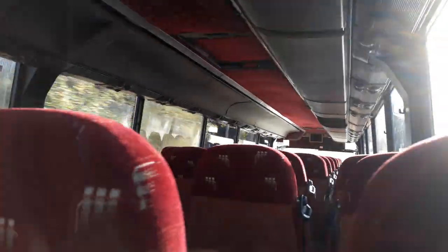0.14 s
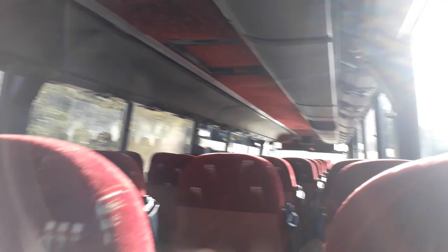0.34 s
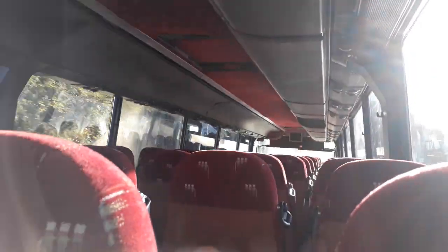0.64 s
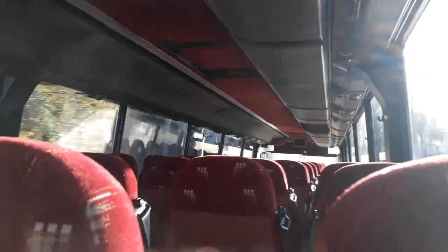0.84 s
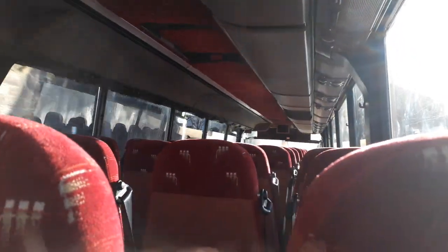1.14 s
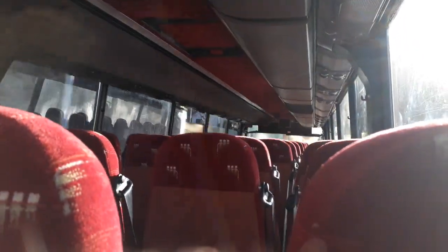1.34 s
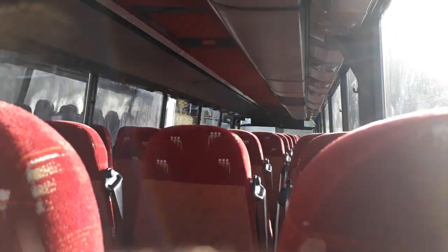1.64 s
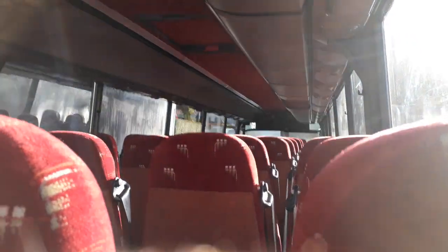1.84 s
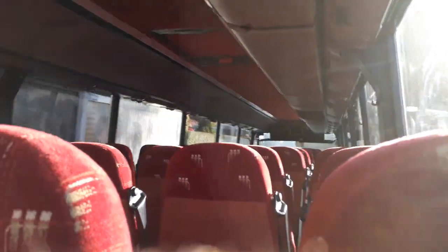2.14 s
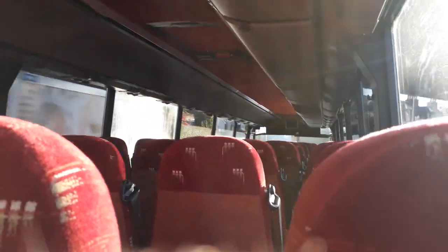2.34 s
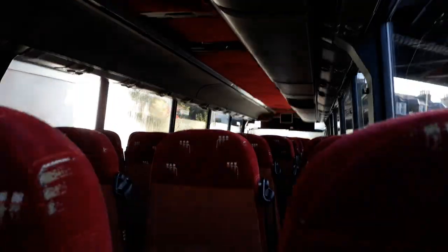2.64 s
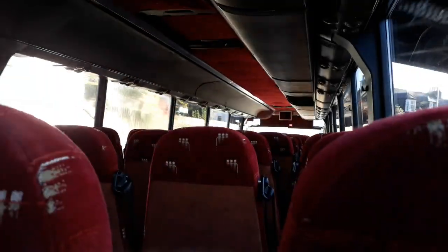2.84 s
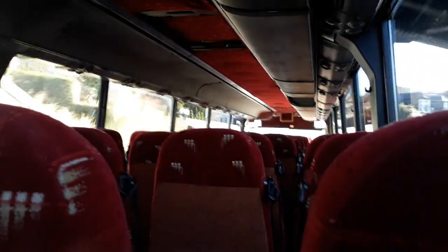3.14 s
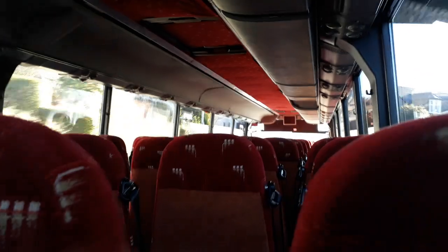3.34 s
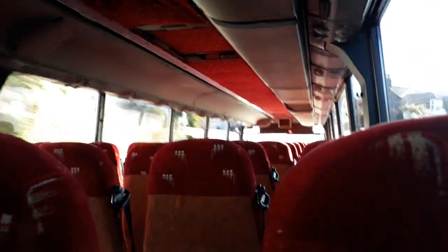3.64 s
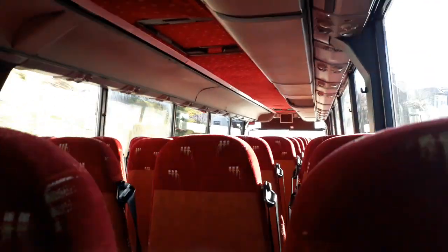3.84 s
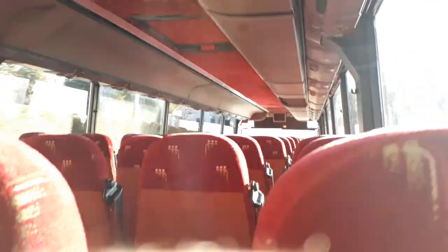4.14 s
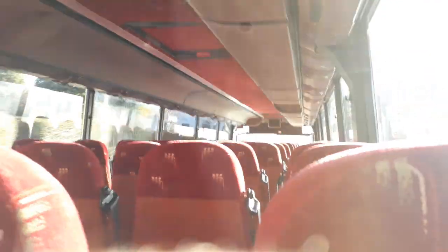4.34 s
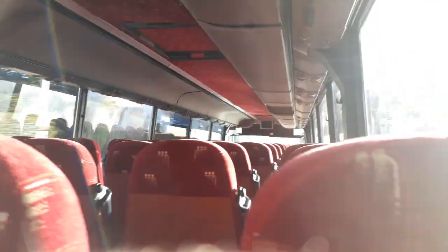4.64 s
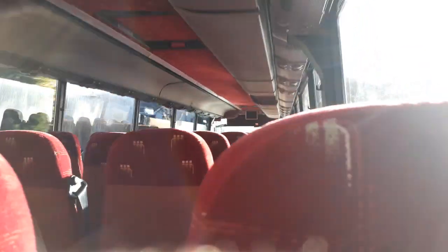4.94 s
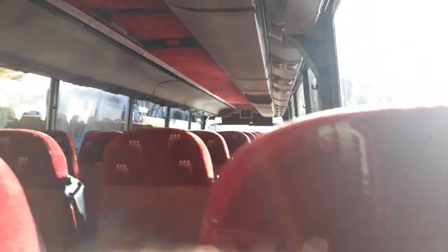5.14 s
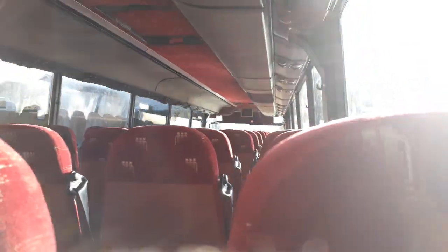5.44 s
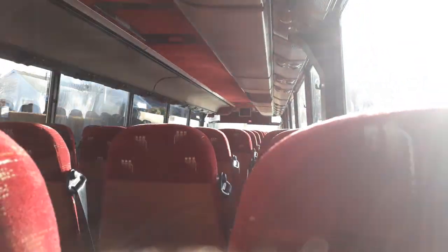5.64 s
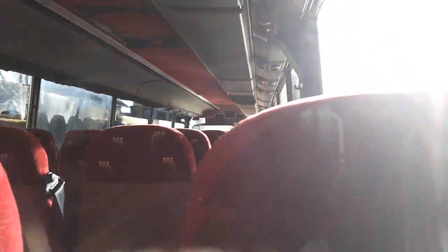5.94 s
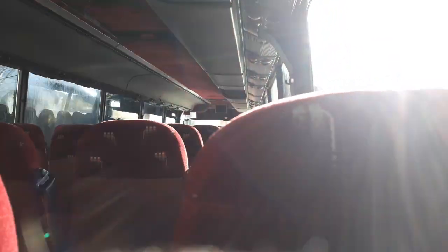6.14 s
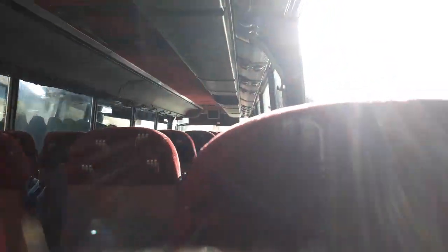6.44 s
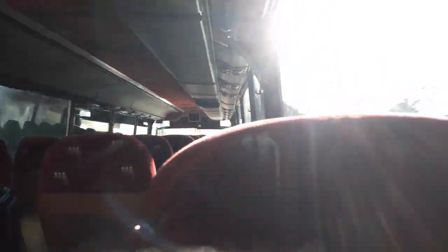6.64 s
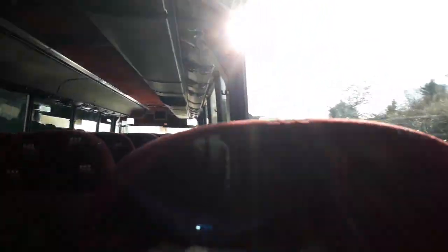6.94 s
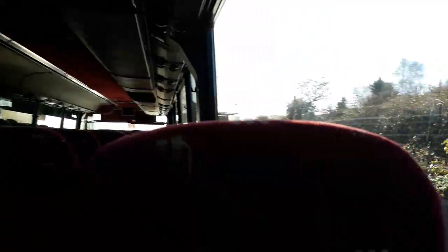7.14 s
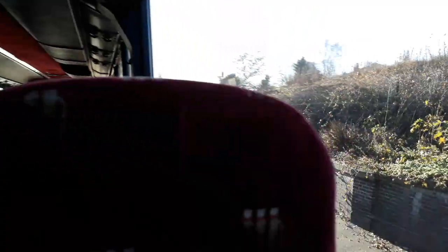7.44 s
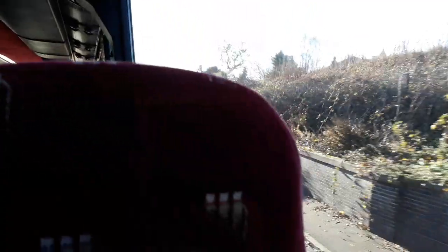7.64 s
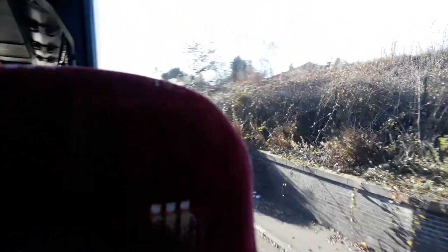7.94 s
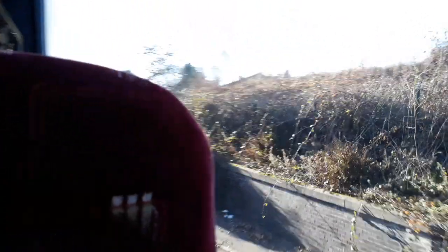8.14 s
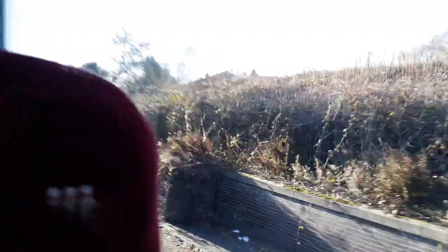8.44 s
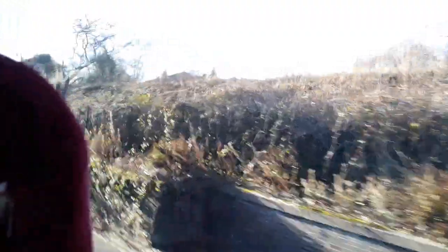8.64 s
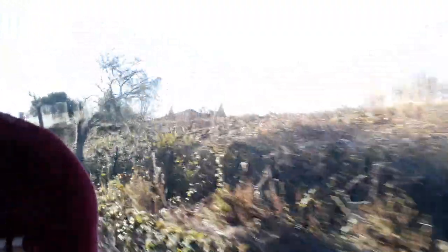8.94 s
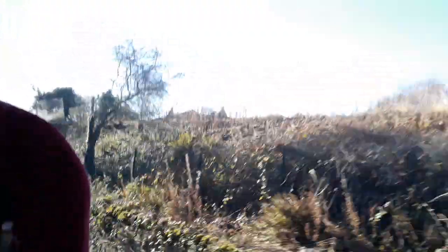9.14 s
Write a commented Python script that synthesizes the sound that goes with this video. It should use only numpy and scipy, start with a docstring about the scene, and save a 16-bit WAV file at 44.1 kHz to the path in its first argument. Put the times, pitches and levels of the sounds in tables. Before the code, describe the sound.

Heard from a passenger seat, the deep boom of a coach's rear diesel fills the cabin along with road noise. The revs fall slowly while panels and loose fittings rattle and tick. A quick rev marks a downshift, and the engine climbs under load, raspier now, with a thin turbo whine and a faint hiss of air. Light rattles, clicks and small metal pings continue as the coach gathers speed.

```python
"""Inside a diesel coach

A rear six-cylinder diesel coasts down, blips for a lower gear, then pulls. Engine and gearbox orders
force the saloon's resonances over road roar; combustion rasps and the turbo whistles up under load.
Impacts excite damped modes: a loose fitting ticks, a small metal part pings, a seat is tapped.
Trim panels rattle and clips snap in noise bursts; an air valve vents and a window seal squeaks."""
import sys
import numpy as np
from scipy import signal
from scipy.fft import rfft, irfft, next_fast_len
from scipy.io import wavfile
from scipy.ndimage import uniform_filter1d, map_coordinates

SR = 44100
rng = np.random.default_rng(int(sys.argv[2]) if len(sys.argv) > 2 else 0)


def dump_mix(stems):
    """Bounce the given channels to the path in sys.argv[1] as a 16-bit WAV at rate SR."""
    frames = np.atleast_2d(stems).T  # one column per channel
    limited = np.clip(frames, -1, 1)  # hard clip at full scale
    pcm = np.round(limited * 32767).astype(np.int16)
    wavfile.write(sys.argv[1], SR, pcm)


N = 410130

# Engine load: t/s, share of full fuel (0-1)
FUEL = [(0, 0.4), (4.66, 0.1), (4.74, 0.64), (5.2, 0.63), (5.35, 0.21), (5.55, 0.7), (6.1, 0.7),
        (6.3, 0.86), (7.3, 0.79), (7.6, 0.8), (9.3, 0.96)]


def amp(db):
    """Amplitude ratio of a level: a factor of ten per 20 dB."""
    return 10 ** (np.asarray(db) / 20)


def unit(x):
    """Normalisation to unit RMS."""
    return x / np.sqrt(np.mean(x ** 2) + 1e-20)


def along(points, hz):
    """Interpolation of (f/Hz, value) points on a logarithmic frequency axis."""
    f, v = np.transpose(points)
    return np.interp(np.log(hz + 1), np.log(f + 1), v)


def curves(rows, step=1):
    """Linear interpolation in time of each column after t/s, every step samples."""
    times, *columns = np.transpose(rows)
    return [np.interp(np.arange(0, N, step) / SR, times, column) for column in columns]


def wobble(rate, step=1):
    """Slow random modulation: a spline with rate knots a second."""
    position = np.arange(0, N, step) * rate / SR
    return map_coordinates(rng.standard_normal(200), [position], order=2, mode="wrap")


def filtered(x, response):
    """Linear filtering: the spectrum times a complex frequency response."""
    size = next_fast_len(x.shape[-1] + 8192)
    return irfft(rfft(x, size) * response(np.fft.rfftfreq(size, 1 / SR)), size)[..., :x.shape[-1]]


def coloured(x, spectrum):
    """Spectral shaping by (f/Hz, gain/dB) points."""
    return filtered(x, lambda hz: amp(along(spectrum, hz)))


def patchy_noise(depth_db):
    """Two white noises, amplitude-modulated in random patches of time and frequency."""
    spectra = signal.stft(rng.standard_normal((2, N)), nperseg=512)[2]
    patches = uniform_filter1d(rng.standard_normal(spectra.shape[1:]), size=6, axis=0)
    patches = uniform_filter1d(patches, size=12, axis=1)
    return unit(signal.istft(spectra * amp(depth_db * unit(patches)), nperseg=512)[1][:, :N])


def stereo_field(pair):
    """Partial coherence: two signals mix to be alike in the bass and less so in the treble."""
    coherence = [(60, .9995), (130, .99), (290, .82), (640, .4), (1400, .45), (15000, .2)]  # likeness of the channels: f/Hz, coherence
    balance = [(60, -.7), (130, -1.6), (220, -2), (450, -.7), (1200, 1.5), (2400, -.3), (4400, -1),
               (8000, -5), (15000, -6)]  # left over right: f/Hz, level/dB
    lead = [(700, -1), (1500, 15), (16000, 16.5)]  # earlier arrival on the left: f/Hz, lead/samples
    half = np.array([[.5], [-.5]])

    def mix(hz):
        angle = np.arccos(np.clip(along(coherence, hz), -1, 1)) / 2
        return np.array([np.cos(angle), np.sin(angle)])

    def skew(hz):
        return amp(half * along(balance, hz)) * np.exp(2j * np.pi * half * hz * along(lead, hz) / SR)

    mid, side = filtered(pair, mix)
    return filtered(np.array([mid + side, mid - side]), skew)


def place(track, start, sound, pan_db):
    """Time and level cues: the sound reaches the left 14 samples early; pan_db is left over right."""
    at, length = round(start * SR), sound.shape[1]
    track[0, at:at + length] += sound[0] * amp(pan_db / 2)
    track[1, at + 14:at + 14 + length] += sound[1] * amp(-pan_db / 2)


def draught_and_valve(load):
    """Turbulent flow: a thin draught hisses with load; an air valve opens, blows, then leaks on."""
    spectrum = [(7000, -30), (8500, -1), (11000, 0), (16000, 0)]  # draught hiss: f/Hz, relative level/dB
    draught = unit(coloured(rng.standard_normal((2, N)), spectrum))
    vent = unit(filtered(draught, lambda hz: 1 / (1 + (hz / 13000) ** 40)))
    opens, shuts, edge_s = 6.05, 7.226, 0.12
    vent_db, = curves([(opens, -100), (opens + edge_s, -74.5), (shuts, -74.5), (shuts + edge_s, -87)])
    return draught * amp(-78 + 6 * load) + vent * amp(vent_db)


def whistle(glide, spread_hz, steady=0):
    """Noise modulation spreads a gliding tone into a narrow band; steady weights the pure carrier."""
    span = slice(round(glide[0][0] * SR), round(glide[-1][0] * SR))
    hz, db = (curve[span] for curve in curves(glide))
    slow_noise = filtered(rng.standard_normal((2, len(hz))), lambda f: np.exp(-(f / spread_hz) ** 2))
    smear = unit(steady + unit(slow_noise))
    flutter_db = 1.3 * wobble(7)[span]
    carrier = np.sqrt(2) * np.sin(2 * np.pi * np.cumsum(hz) / SR)
    track = np.zeros((2, N))
    track[:, span] = amp(db + flutter_db) * smear * carrier
    return track


def window_seal():
    """Friction tones: the seal gives a two-tone creak and a nearly pure squeak."""
    squeak = [(9, 13300, -86), (9.04, 14900, -69), (9.065, 14500, -61), (9.09, 14700, -71),
              (9.125, 13900, -74), (9.165, 13600, -74), (9.19, 13000, -80)]  # squeak glide: t/s, f/Hz, level/dB
    creak = [(3.59, 14000, -92), (3.64, 14480, -80), (3.7, 14910, -74), (3.73, 14900, -76),
             (3.75, 14500, -84)]  # upper tone of the creak: t/s, f/Hz, level/dB
    lower = [(s, .9 * hz, db - 7) for s, hz, db in creak]
    squeal = whistle(squeak, spread_hz=27, steady=2.5)
    return squeal + whistle(creak, spread_hz=90) + whistle(lower, spread_hz=90)


def clip_snaps():
    """Two-stage decay: each plastic clip gives a bright crack and a short scattered tail."""
    snaps = [(0.02, -34.5), (0.0782, -45.5), (0.26, -50.5), (0.2906, -40.5), (0.4908, -53.5), (0.7028, -51),
             (0.7418, -46.5), (0.7997, -52), (0.8475, -54), (1.0006, -57.5), (1.0779, -52), (1.379, -47),
             (1.6531, -51), (1.8033, -56), (3.0177, -59.5), (3.1822, -54.5), (3.758, -51), (3.841, -42),
             (3.864, -45.5), (4.011, -50), (4.578, -48.5), (4.715, -55.5), (5.0459, -51.5), (5.1497, -50.5),
             (6.4477, -50.5), (7.989, -38), (8.8064, -51), (8.844, -49)]  # clips snapping: t/s, level before shaping/dB
    spectrum = [(1500, -39.5), (3000, -6.5), (5000, 4.5), (7200, 10.5), (8800, -9), (11000, 3.5),
                (15500, -2)]  # colour of a clip: f/Hz, gain/dB
    crack_t60, tail_t60 = 0.0098, 0.065
    track, t = np.zeros((2, N + SR)), np.arange(SR // 10) / SR
    envelope = (amp(-60 * t / crack_t60) + amp(-12.5 - 60 * t / tail_t60)) * (1 - np.exp(-t / .0004))
    for start, db in snaps:
        place(track, start, amp(db) * envelope * rng.standard_normal((2, len(t))), pan_db=-9)
    return coloured(track, spectrum)[:, :N]


def struck(blows, modes, pan_db, clack=.5):
    """Free vibration: damped modes ring after a contact clack; windows and roof reflect a tail."""
    track = np.zeros((2, N + SR))
    t, late = np.arange(SR // 20) / SR, np.arange(SR // 5) / SR
    for start, db, upper_db, main_hz in blows:
        ring = np.zeros(len(t))
        for ratio, mode_db, t60 in modes:
            envelope = amp(mode_db + (ratio > 1.75) * upper_db + rng.normal(0, 1) - 60 * t / t60)
            ring += envelope * np.sin(2 * np.pi * ratio * main_hz * rng.normal(1, .02) * t)
        ring += clack * amp(-60 * t / 0.005) * uniform_filter1d(rng.standard_normal(len(t)), size=8)
        ring *= 1 - np.exp(-t / 0.00044)
        room = rng.standard_normal((2, len(late))) * amp(-24.5 - 60 * late / 0.09)
        room *= 1 - np.exp(-late / 0.0013)
        room[:, 0] = 1  # direct sound
        room[:, round(rng.uniform(.005, .0125) * SR)] = rng.uniform(.15, .45)  # one bounce
        place(track, start, amp(db) * signal.fftconvolve(ring[None], room, axes=1), pan_db)
    return track[:, :N]


def loose_fitting():
    """Heavy damping: the fitting's inharmonic modes die so fast that each blow is a tick."""
    blows = [(0.2924, -21, -14.5, 2445), (0.304, -27.5, -12, 1800), (0.3155, -34.5, -25, 2280),
             (0.3611, -37, -26, 2470), (0.403, -30.5, -22, 2370), (0.4273, -30.5, -22, 2350),
             (0.4484, -40.5, -22, 2290), (0.4635, -36.5, -20, 2350), (0.733, -33.5, -30, 2350),
             (0.722, -27.5, -26, 2369), (1.2465, -35, -29, 2290), (1.3538, -21.5, -16, 2350),
             (1.5984, -25.5, -13, 2350), (1.8037, -25.5, -14, 2370), (3.3702, -37.5, -27, 2320),
             (3.766, -28, -30, 2280), (3.908, -34, -22, 2300), (4.3163, -34.5, -31, 2300)]  # impacts: t/s, level/dB, upper-mode gain/dB, main mode f/Hz
    modes = [(0.72, -2, 0.008), (1, 6, 0.009), (1.17, -3, 0.006), (1.43, -3, 0.006), (2.07, 13, 0.004),
             (2.949, 4, 0.004)]  # its modes: ratio to the main mode, level/dB, T60/s
    return struck(blows, modes, pan_db=-7)


def seat_taps():
    """Impact excitation: something hard taps a seat back twice."""
    blows = [(8.5973, -29.5, -17, 2412), (8.7128, -27, -8, 2232)]  # taps: t/s, level/dB, upper-mode gain/dB, main mode f/Hz
    modes = [(0.62, 8, 0.011), (0.8, 4.5, 0.011), (1, 8, 0.011), (1.2, 4, 0.01), (1.45, -1, 0.008),
             (1.9, 6.5, 0.006)]  # seat-back modes: ratio to the main mode, level/dB, T60/s
    return struck(blows, modes, pan_db=-5.5)


def metal_pings():
    """Lighter damping: two modes of a small metal part ring long enough to have a pitch."""
    blows = [(5.567, -47, 2, 3356), (5.6233, -42, 0, 3350), (5.6622, -43, 0, 3358),
             (5.7096, -35.5, 0, 3380), (6.8031, -44, 0, 3323), (7.7091, -42, 0, 3355),
             (7.7904, -37, 0, 3342), (8.6285, -37, 3, 3350)]  # impacts: t/s, level/dB, upper-mode gain/dB (no effect), main mode f/Hz
    modes = [(1, -1.5, 0.027), (1.26, -8, .02)]  # its modes: ratio to the main mode, level/dB, T60/s
    return struck(blows, modes, pan_db=0, clack=.1)


def trim_rattles():
    """Intermittent contact: each jolt gives a spiky, fast-dying noise burst and tiny ringing impacts."""
    jolts = [(0.0199, -25.5, 0.14), (0.088, -32, 0.13), (0.193, -31, 0.12), (0.2637, -37.5, 0.069),
             (0.2924, -28, 0.044), (0.7, -29, 0.13), (0.76, -37.5, 0.14), (0.7966, -28, 0.11),
             (0.8444, -34, 0.15), (0.9056, -32.5, 0.12), (1.172, -44.5, 0.16), (1.2437, -41, 0.1),
             (1.3557, -36.5, 0.13), (1.653, -38.5, 0.061), (1.8032, -32.5, 0.027), (2.2057, -35, 0.055),
             (2.6016, -47, 0.056), (2.7014, -50, 0.04), (3.085, -42.5, 0.072), (3.141, -39.5, 0.1),
             (3.8423, -40.5, 0.12), (4.012, -43, 0.086), (4.5765, -39, 0.058), (4.6917, -35.5, 0.13),
             (4.91, -38, 0.036), (4.9646, -37, 0.11), (5.018, -34.5, 0.13), (5.1488, -41, 0.082),
             (5.7103, -39.5, 0.11), (5.7583, -32.5, 0.1), (5.804, -36.5, 0.08), (5.8472, -41, 0.11),
             (6.3134, -46.5, 0.046), (6.4492, -41, 0.06), (6.6937, -37.5, 0.12), (6.8497, -37.5, 0.091),
             (6.9894, -40, 0.063), (7.254, -31, 0.078), (7.3003, -35, 0.15), (7.3454, -37.5, 0.064),
             (7.4306, -40, 0.05), (7.4797, -40, 0.05), (7.5317, -37.5, 0.17), (7.6148, -32.5, 0.1),
             (7.7937, -42.5, 0.099), (7.986, -28.5, 0.11), (8.0412, -34, 0.082), (8.16, -34.5, 0.1),
             (8.4467, -34, 0.083), (8.844, -38, 0.092), (9.0868, -32.5, 0.1)]  # jolts of the panels: t/s, level/dB, T60/s
    spectrum = [(700, -56), (1000, 0), (1800, -1.5), (2500, -3.5), (2750, -0.5), (3050, -6), (3370, -2.5),
                (3800, -4.5), (5000, -6), (5700, -11), (7000, -12), (8000, -21.5), (8800, -51.5),
                (10000, -85)]  # colour of the panels: f/Hz, gain/dB
    modes = [(2350, 1.5, 0.0088), (2550, -1.5, 0.0074), (3400, -5.5, 0.012), (4600, -5, .006)]  # modes rung by the tiny impacts: f/Hz, level/dB, T60/s
    panel, top, impacts = np.zeros((3, 2, N + SR))
    t = np.arange(SR // 5) / SR
    faint_jolts = [(when * N / SR, -54 + 6 * size, 0.057) for when, size in rng.random(size=(20, 2))]
    for start, db, t60 in jolts + faint_jolts:
        chatter = amp(21 * uniform_filter1d(rng.standard_normal(len(t)), size=49))  # jumps about each ms
        noise = 0.37 * rng.standard_normal(len(t)) + 1.02 * rng.standard_normal((2, len(t)))
        rebounds = sum(np.exp(-((t - at) / 0.0026) ** 2) for at in t60 * rng.uniform(0, 0.38, size=2))
        burst = noise * chatter * (1 - np.exp(-t / 0.00033)) * (1 + 0.65 * rebounds)
        fall_db = -60 * (t / t60) ** 1.48
        pan_db = rng.normal(-2, 2)  # the panels lie scattered to the right
        place(panel, start, amp(db + fall_db) * burst, pan_db)
        place(top, start, amp(db + 1.6 * fall_db) * burst, pan_db)  # the top octave dies sooner
        ring_t = t[:SR // 50]
        for when, lightness, choice in rng.random(size=(5, 3)):
            delay = 0.33 * t60 * when
            hz, mode_db, ring_t60 = modes[int(choice * len(modes))]
            hz *= 1 + .06 * (lightness - .5)
            ping = amp(mode_db - 60 * ring_t / ring_t60) * np.sin(2 * np.pi * hz * ring_t)
            gain = amp(db - 2 - 10 * lightness + fall_db[round(delay * SR)])
            place(impacts, start + delay, gain * np.array([ping, ping]), pan_db)
    top = filtered(top, lambda hz: amp(-29.5) / (1 + (8800 / (hz + 1)) ** 12))
    return (coloured(panel, spectrum) + top + impacts)[:, :N]


def turbocharger():
    """Aerodynamic tones: a breathy intake whistle, then the narrower whine of the compressor blades."""
    intake = [(4.7, 3650, -88), (4.9, 3940, -67), (5.25, 3997, -62), (5.4, 3944, -79), (5.6, 4050, -61),
              (5.85, 4320, -57), (6.0, 4290, -65), (6.08, 4358, -62), (6.22, 4612, -57.5), (6.5, 4550, -60),
              (6.85, 4686, -58.5), (7.4, 4512, -61), (7.8, 4395, -93)]  # intake whistle: t/s, f/Hz, level/dB
    blades = [(7.3, 6408, -97), (7.7, 6737, -67.5), (8.4, 7420, -68.5), (9.3, 7913, -69.5)]  # blade whine: t/s, f/Hz, level/dB
    return whistle(intake, spread_hz=210) + whistle(blades, spread_hz=75, steady=.2)


def cam_turns(step=1):
    """Phase as the integral of speed: the camshaft turns once per two crankshaft turns."""
    crank_speed = [(0, 1143), (0.6, 1112), (1.2, 1058), (2.4, 985.7), (3.0, 934.4), (3.3, 895),
                   (3.6, 868.7), (3.9, 808.3), (4.35, 768.6), (4.65, 718.5), (5.1, 926), (5.25, 944),
                   (5.45, 908.5), (5.75, 1021), (6.15, 1120), (6.45, 1215), (7.0, 1305), (7.9, 1370),
                   (8.7, 1434), (9.3, 1482)]  # crankshaft: t/s, speed/rpm
    return np.cumsum(curves(crank_speed, step)[0]) * step / (120 * SR)


def combustion(load):
    """Amplitude modulation: six firings per camshaft turn pulse a hiss and a rasp that grow with load."""
    hiss_spectrum = [(760, -41), (1300, 4.5), (1530, -1), (2610, -11), (3870, -14.5), (4260, -13.5),
                     (5230, -21.5), (5660, -27), (6950, -21.5), (8600, -45.5), (11200, -66), (18900, -120)]  # engine hiss: f/Hz, relative level/dB
    rasp_spectrum = [(800, -9.5), (1000, -8.5), (1100, 3), (1170, -1), (1280, 1), (1420, -14.5),
                     (1800, -13), (2600, -17), (4000, -62.5), (6000, -120)]  # combustion rasp: f/Hz, relative level/dB
    rasp_course = [(5.5, -42, .1), (6.05, -42, .25), (6.25, -38.5, .55), (7.2, -38.5, .55), (7.5, -41, .4),
                   (9.3, -42, .4)]  # rasp at full fuel: t/s, level/dB, weight of the clean blows
    turns = cam_turns()
    gate = 1 + (0.043 + 0.046 * load) * np.cos(2 * np.pi * 6 * turns)
    hiss = unit(coloured(gate * patchy_noise(1.4), hiss_spectrum))
    rasp_db, blow_weight = curves(rasp_course)
    blows = np.diff(np.floor(3 * turns), prepend=0)  # every other firing lands harder
    blows = blow_weight * unit(blows * amp(rng.normal(0, 0.87, N)))
    rasp = unit(coloured(blows + gate * rng.standard_normal((2, N)), rasp_spectrum))
    return hiss * amp(-55 + 12.5 * load) + rasp * load * amp(rasp_db)


def shaft_orders():
    """Forced vibration: sines locked to the shafts swell as they sweep through body-frame resonances."""
    # Engine orders: multiple of camshaft speed (rounded below), coasting level/dB, pulling level/dB
    engine = [(3, 22, 12), (6.01, 14, 20.5), (7, -4.5, 16.5), (8.99, 14.5, 13), (10, -4, 17.5),
              (11, -11.5, 21.5), (12, 14, 11), (13.04, -12.5, 18.5), (13.93, 10.5, 14.5),
              (14.99, 16.5, 11.5), (15.98, 15.5, 6.5), (18.01, 17, 11), (21.97, -13.5, 13.5),
              (22.93, -6.5, 9), (24, -6.5, 11.5), (25.98, -10.5, 14), (30, 1, 15), (32, -8.5, 5),
              (33.93, -12.5, 11), (36, -2, 11.5), (44.9, -13, 8), (48.03, 4.5, 7.5)]
    # Shafts and tooth mesh: multiple of camshaft speed, coasting level/dB, pulling level/dB
    gears = [(20.51, 13, 11.5), (23.72, 12.5, 14), (25.27, 13.5, 2.5), (27.53, 12, 5), (30.54, -1, 19.5),
             (30.94, 11, -1), (32.1, 17, -6), (62, 15, 14.5), (112.1, 11.5, 1.5), (125.7, 12.5, -4)]
    # Gains of groups of orders: t/s, firing/dB, multiples of three (9, 12, 15, 18)/dB, whines/dB, shafts/dB,
    group_gains = [(0, -10.5, -0.5, 3.5, -0.5, 1.5), (.7, -3, -2, 1, -3.5, -0.5),
                   (1.1, -4.5, 0.5, -8, -2, 1), (1.9, -3, 0.5, -5.5, -0.5, -4),
                   (2.8, -1.5, 0.5, -4, 2.5, 0.5), (3.25, 9, -0.5, 4.5, 1, -4),
                   (3.7, 4, -1.5, -5, -1.5, 2.5), (4.1, 15.5, -3.5, -8.5, 1, 2),
                   (4.6, 11.5, -3, -12, 0, -0.5), (5.2, 7, -0.5, -2.5, -7.5, -4),
                   (5.7, -8, 5, -13, -17.5, -12), (6.2, 2.5, 3.5, -1, -18.5, -7.5),
                   (6.9, 0, 7.5, 6, -11.5, -8), (7.4, -0.5, 0.5, 3.5, -13.5, -1.5),
                   (7.8, 4.5, 1.5, 6, -7.5, 4), (8.4, 4, 1, -2, -1, 2.5), (8.8, 2, 0.5, -0.5, 2.5, 0.5),
                   (9.3, 1, -7, -5.5, 1, 2.5)]
    frame_modes = [(40.4, 5, -1.5), (75.1, 11.4, 10.5), (134.1, 9, 8), (234.7, 18, 10.5), (324.4, 35, 13.5),
                   (367.6, 40, 10), (397, 23, 12), (480, 27, 6.5), (556.5, 27, 15), (731, 42, 6.5),
                   (833, 14, 18), (915, 51, 14), (1150, 120, 7.5)]  # body-frame resonances: f/Hz, bandwidth/Hz, gain/dB
    step = 8  # low tones allow a sample rate of SR / step
    turns, load = cam_turns(step), curves(FUEL, step)[0]
    cam_hz = np.gradient(turns) * SR / step
    firing_db, threes_db, whine_db, shaft_db, uneven_db = curves(group_gains, step)
    tones = np.zeros((2, len(turns)))
    for order, coast_db, pull_db in [(round(k), *levels) for k, *levels in engine] + gears:
        group_db = (firing_db * (order in (6, 12)) + threes_db * (order in (9, 12, 15, 18))
                    + whine_db * (order in (36, 62)) + shaft_db * (order % 1 > 0 and order < 60)
                    + uneven_db * (order in (7, 10, 11)))
        waver_db = 1.5 * wobble(1.576, step)
        gain = amp(-45 + group_db + coast_db + load * (pull_db - coast_db) + waver_db)
        resonance = sum(amp(2 * db) / (1 + (2 * (order * cam_hz - hz) / width) ** 2)
                        for hz, width, db in frame_modes)
        twist = .002 * wobble(9, step)  # camshaft turns by which the driveline winds and unwinds
        cycles = order * (turns + twist) + rng.random((2, 1))
        tones += gain * np.sqrt(1 + resonance) * np.sin(2 * np.pi * cycles)
    return signal.resample_poly(tones, step, 1, axis=1)[:, :N]


def saloon_boom():
    """Cavity resonance: the saloon colours shaft orders and road roar, in two bands split at 190 Hz."""
    response = [(12, -44.5), (20, -17.5), (69, -0.5), (136, 2), (183, -5), (237, -7.5), (291, -15.5),
                (454, -13), (578, -20.5), (700, -18), (938, -26), (1090, -17.5), (1170, -31), (1520, -51.5),
                (1700, -34.5), (2210, -43), (3740, -120)]  # saloon resonances: f/Hz, relative gain/dB
    band_levels = [(0, -25.5, -31.5), (0.41, -27, -34), (2.02, -26, -35), (3.08, -32, -35.5),
                   (4.58, -34, -36.5), (4.95, -28.5, -33), (5.52, -32, -35.5), (5.7, -25, -32),
                   (6.76, -22.5, -30), (7.46, -25, -29.5), (9.3, -23, -29)]  # the two bands: t/s, boom level/dB, low-middle level/dB
    boom_db, middle_db = curves(band_levels)
    drive = shaft_orders() + patchy_noise(1.0)
    lowpass = lambda hz: 1 / (1 + (hz / 190) ** 6)
    boom = unit(filtered(drive, lambda hz: amp(along(response, hz)) * lowpass(hz)))
    middle = unit(filtered(drive, lambda hz: amp(along(response, hz)) * (1 - lowpass(hz))))
    return boom * amp(boom_db) + middle * amp(middle_db)


def scene():
    """Superposition: sustained sounds share one stereo field; impacts are placed one by one."""
    load, = curves(FUEL)
    sustained = saloon_boom() + combustion(load) + draught_and_valve(load) + turbocharger() + window_seal()
    impacts = loose_fitting() + seat_taps() + metal_pings() + trim_rattles() + clip_snaps()
    return stereo_field(sustained) + impacts


def record(dry):
    """Band limiting: an ideal low-pass at 15.9 kHz."""
    return filtered(dry, lambda hz: hz < 15900)


dry = scene()
out = record(dry)
dump_mix(out)
```